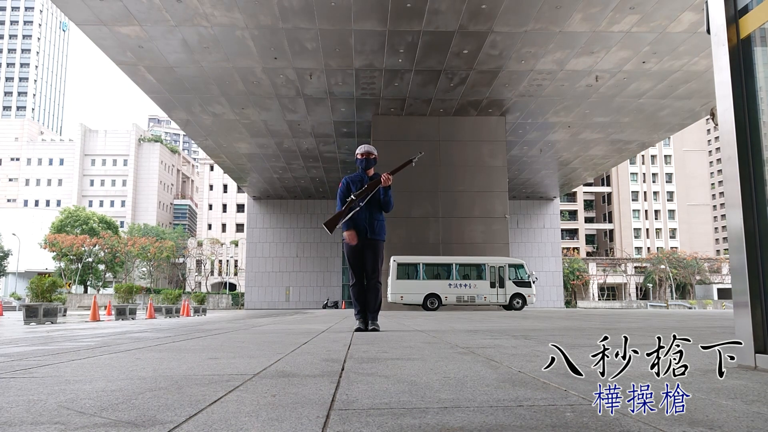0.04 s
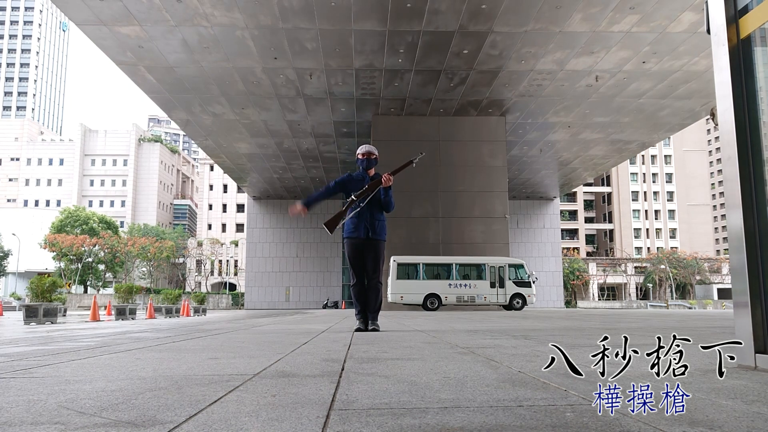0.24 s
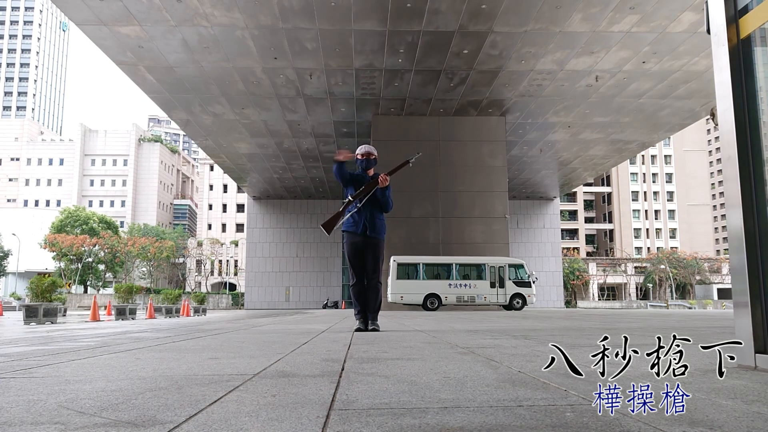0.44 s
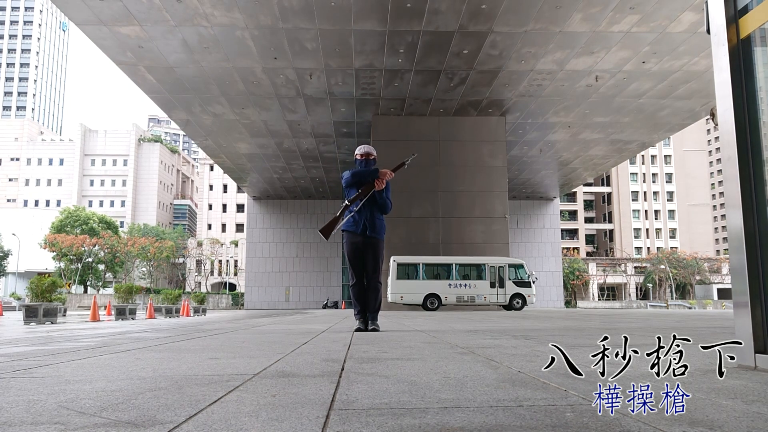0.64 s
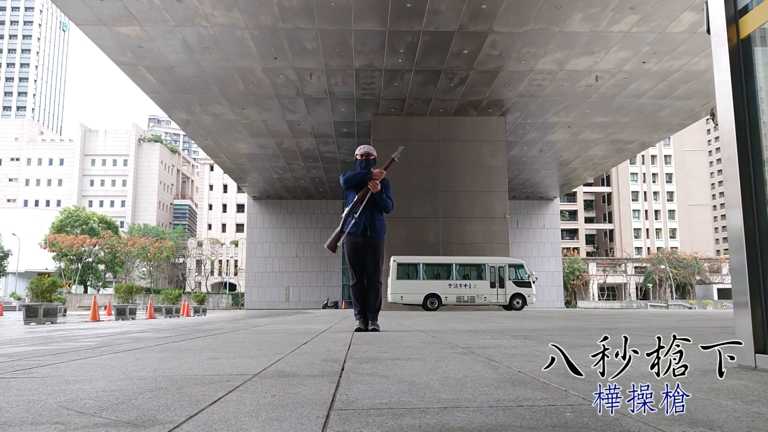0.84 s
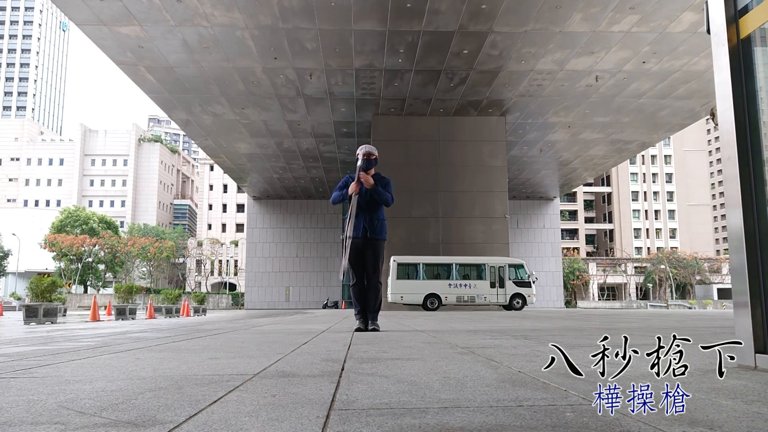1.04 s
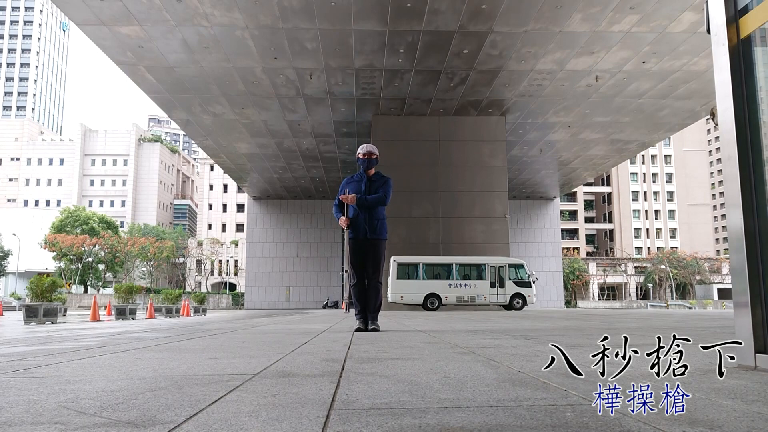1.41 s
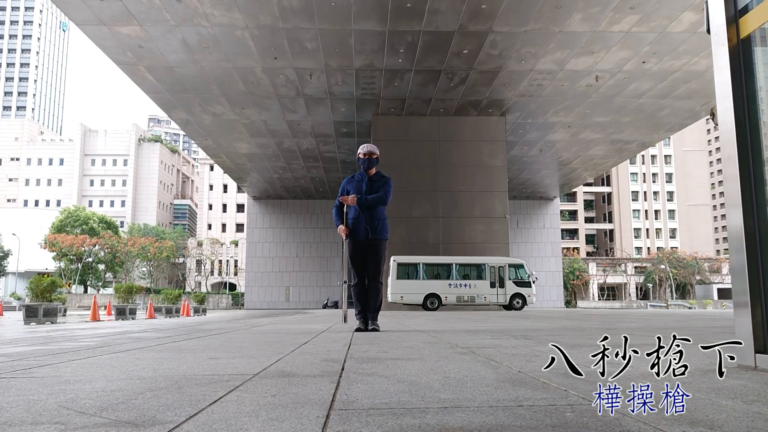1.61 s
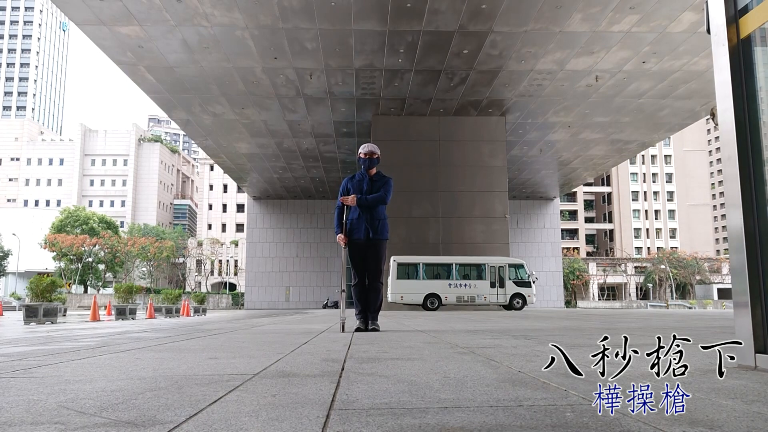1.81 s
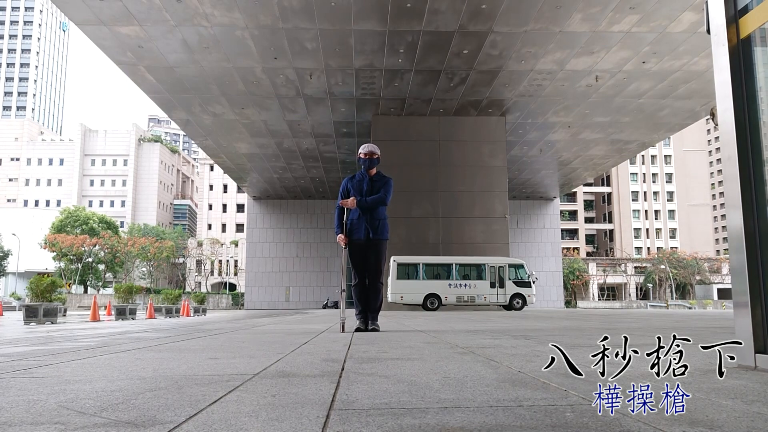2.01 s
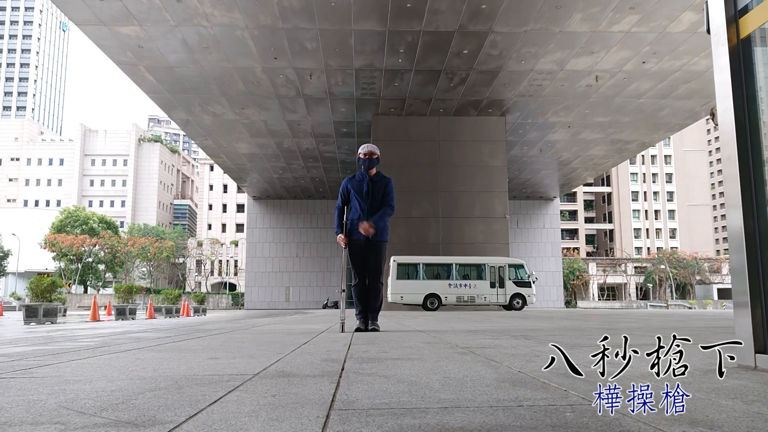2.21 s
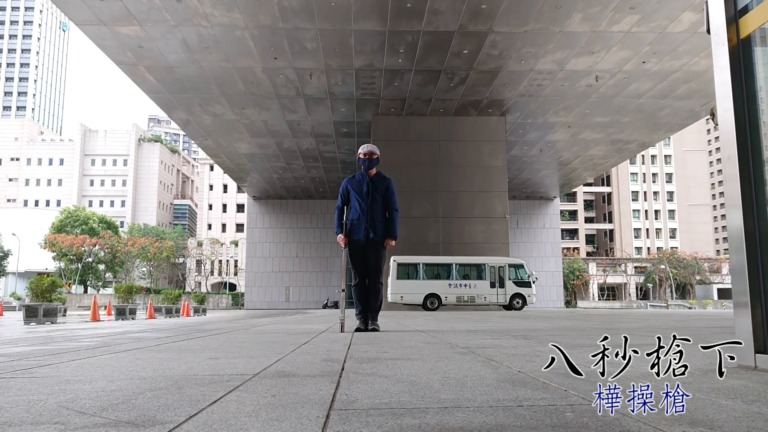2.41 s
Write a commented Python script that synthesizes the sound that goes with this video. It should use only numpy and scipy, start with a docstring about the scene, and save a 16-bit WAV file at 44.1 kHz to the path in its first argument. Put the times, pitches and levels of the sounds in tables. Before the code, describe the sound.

A rifle is handled with dry slaps, then its butt knocks on paving, over faint wind.

```python
"""Wind buffets the microphone, mostly its right port, over distant traffic and faint high squeaks.
Under a concrete overpass, a rifle drill: loose steel fittings jingle and clink, hands slap and slide
on the stock, and at about 2 s the butt is grounded, chattering on the paving and ringing the rifle.
The deck above and the far walls throw the blows back."""
import sys
import numpy as np
from scipy import signal
from scipy.fft import rfft, irfft
from scipy.io import wavfile
from scipy.ndimage import uniform_filter1d

SR = 44100
rng = np.random.default_rng(int(sys.argv[2]) if len(sys.argv) > 2 else 0)


def digitize_waveform(pressure):
    """Quantize a signal to 16-bit integers and store it at the path in sys.argv[1].

    Rows of a 2-D input are taken as channels; values are limited to [-1, 1].
    """
    field = np.atleast_2d(pressure).T
    bounded = np.clip(field, -1, 1)
    quanta = np.round(bounded * 32767).astype(np.int16)
    wavfile.write(sys.argv[1], SR, quanta)


N = 112454
TIME, FREQ = np.arange(N) / SR, np.fft.rfftfreq(N, 1 / SR)


def amp(db):
    """Decibels to gain."""
    return 10 ** (np.asarray(db) / 20)


def unit(x):
    """Scale to rms 1."""
    return x / np.sqrt(np.mean(x ** 2))


def noise():
    """White noise."""
    return rng.standard_normal(N)


def pair(likeness):
    """Left and right noise, from unrelated (0) to identical (1)."""
    return np.sqrt(likeness) * noise() + np.sqrt(1 - likeness) * rng.standard_normal((2, N))


def impulse(at):
    """A single sharp push at a given time."""
    return signal.unit_impulse(N, int(at * SR))


def decay(t60):
    """Envelope that falls 60 dB in t60 seconds."""
    return np.exp(-np.log(1000) * TIME / t60)


def delayed(x, at):
    """The same sound, starting `at` seconds later."""
    start = int(at * SR)
    out = np.zeros_like(x)
    out[..., start:] = x[..., :N - start]
    return out


def convolve(x, h):
    """Pass a sound through an impulse response."""
    return signal.fftconvolve(np.atleast_2d(x), np.atleast_2d(h), axes=-1)[:, :N]


def response(points, size=8192):
    """Minimum-phase impulse response of a curve of f/Hz, level/dB."""
    hz, db = np.array(points).T
    f = np.maximum(np.fft.rfftfreq(size, 1 / SR), 1)
    gain = amp(np.interp(np.log(f), np.log(hz), db))
    cepstrum = irfft(np.log(gain))
    cepstrum[1:size // 2] *= 2
    cepstrum[size // 2 + 1:] = 0
    return irfft(np.exp(rfft(cepstrum)))


def colour(x, points):
    """Colour a white sound, keeping its power."""
    h = response(points)
    return convolve(x, h / np.linalg.norm(h))


def contour(rows):
    """Gain that glides through rows of t/s, level/dB."""
    return amp(np.interp(TIME, *np.array(rows).T))


def swells(rows):
    """A bell-shaped envelope for each row of t/s, level/dB, width/s."""
    return sum(amp(db) * np.exp(-.5 * ((TIME - at) / width) ** 2) for at, db, width in rows)


def blows(rows):
    """Contact force: a fast-dying crunch for each row of t/s, level/dB, decay/s."""
    return sum(amp(db) * delayed(noise() * np.exp(-TIME / fade), at) for at, db, fade in rows)


def eddies(spectrum, span_s=0.099, evenness=0.57):
    """Turbulent pressure at a microphone port, of fairly even strength."""
    pressure = colour(noise(), spectrum)[0]
    window = int(span_s * SR / 2)
    power = uniform_filter1d(uniform_filter1d(pressure ** 2, window), window)
    return unit(pressure / (power + 0.023) ** (evenness / 2))


# wind on the exposed right port: t/s, level/dB
RIGHT_WIND = [(0, -28), (.12, -36), (.25, -28.5), (0.409, -26), (.46, -41.5), (.57, -26.5), (0.771, -26.5),
              (0.817, -17.5), (0.859, -30.5), (0.928, -22), (1.02, -33), (1.17, -27), (1.25, -34),
              (1.37, -27.5), (1.68, -27.5), (1.77, -26), (1.9, -26), (1.94, -40.5), (2.24, -29),
              (2.349, -37), (2.55, -33.5)]
# single gusts on each port: t/s, level/dB, width/s
RIGHT_GUSTS = [(.907, -23, 0.0035), (.928, -24.5, 0.0026), (1.573, -20.5, .002), (1.591, -22.5, 0.0056),
               (1.7095, -12.5, 0.0023), (1.7205, -13, 0.0067), (1.750, -17.5, 0.0019), (1.763, -21, 0.0043)]
LEFT_GUSTS = [(1.04, -37, 0.019), (1.744, -29, .008), (1.82, -45, 0.025), (1.97, -40, 0.04)]
# spectra of the buffeting and of the right port's gusts: f/Hz, level/dB
BUFFET_COLOUR = [(22, -47), (36, -11), (52, 6.5), (75, 1.5), (110, -1), (190, -11), (300, -21), (600, -39),
                 (6000, -92)]
GUST_COLOUR = [(25, -33.5), (45, -8), (75, 5.5), (130, -6.5), (195, -0.5), (280, -11), (480, -20.5),
               (900, -41), (6000, -100)]
def wind(swirl_db=-2.5, lee_db=-49.5):
    """Air buffets each port, the left in the lee; gusts on the right are brighter and thump at the crest."""
    crests = sum(amp(db) * np.sqrt(width * SR) * impulse(at) for at, db, width in RIGHT_GUSTS)
    thumps = colour(crests, GUST_COLOUR)[0]
    swirl = amp(swirl_db) * eddies(GUST_COLOUR) * swells(RIGHT_GUSTS)
    right = eddies(BUFFET_COLOUR) * contour(RIGHT_WIND) + swirl + thumps
    left = eddies(BUFFET_COLOUR) * (amp(lee_db) + swells(LEFT_GUSTS))
    return np.array([left, right])


# spectrum of the streets from a distance: f/Hz, level/dB
TRAFFIC_COLOUR = [(30, 2), (70, 4.5), (200, 2), (450, 0), (900, -5.5), (1500, -13), (3000, -14.5),
                  (5000, -19.5), (7000, -29.5), (11000, -37), (15000, -43)]
# their slow drift in loudness: t/s, level/dB
TRAFFIC_LEVEL = [(0, -49.5), (.9, -51), (1.5, -51), (1.85, -51.5), (2.55, -48.5)]
def traffic():
    """The even wash of distant streets, wide across both ports."""
    return colour(pair(likeness=0.16), TRAFFIC_COLOUR) * contour(TRAFFIC_LEVEL)


# faint high squeaks in the background: t/s, length/s, f/Hz, half-width/Hz, level/dB
SQUEAKS = [(0.13, 0.093, 4710, 60, -64), (0.267, 0.47, 6270, 220, -69.5), (0.859, 0.0061, 6100, 1090, -50),
           (1.055, 0.061, 3200, 70, -64)]
def squeaks():
    """Narrow bands of noise, heard as thin wavering tones."""
    out = np.zeros((2, N))
    for at, length, hz, width, db in SQUEAKS:
        band = 1 / (1 + ((FREQ - hz) / width) ** 2) ** 2
        tone = unit(irfft(rfft(pair(likeness=0.51)) * band, N))
        flat_swell = np.exp(-(2 * (TIME - at) / length - 1) ** 4)
        out += amp(db) * tone * flat_swell
    return out


# small metallic jingles at the rifle: t/s, level/dB, width/s
JINGLES = [(.319, -46.5, 0.0069), (.366, -56, 0.0044), (.474, -53, 0.0091)]
# their spectrum: f/Hz, level/dB
JINGLE_COLOUR = [(1500, -43.5), (3600, 5.5), (5400, -2.5), (6350, 15.5), (7200, -8), (11000, -3),
                 (15000, -21)]
def jingles():
    """Metal rubs on metal in short swells of fine friction."""
    return colour(noise() * swells(JINGLES), JINGLE_COLOUR)


def paving(x, scatter_db=-3.5, decay_s=0.00092, above_hz=1200):
    """Direct sound plus treble scattered off the ground by the microphone, different at each port."""
    highpass = signal.butter(2, above_hz, "high", fs=SR, output="sos")
    scatter = pair(likeness=0) * np.exp(-TIME / decay_s)
    scatter = signal.sosfilt(highpass, scatter[:, :SR // 20])
    scatter /= np.linalg.norm(scatter, axis=1, keepdims=True)
    return x + amp(scatter_db) * convolve(x, scatter)


def bloom(rise_s, t60):
    """Unit-energy envelope of reflections that build up and die away."""
    rise = 1 - np.exp(-(TIME / rise_s) ** 2)
    return unit(rise * decay(t60)) / np.sqrt(N)


# echoes from the deck overhead and the far walls: delay/s, level/dB
ECHOES = [(0.0414, -14), (.052, -13.5), (0.0653, -19), (0.087, -24.5), (.246, -27.5)]
# their spectrum: f/Hz, level/dB
ECHO_COLOUR = [(200, 3), (1000, 4), (3400, 1.5), (7000, -0.5), (15000, -15)]
# reverberation under the deck: f/Hz, early level/dB, early t60/s, late level/dB, late t60/s
REVERB_BANDS = [(199, -30.5, .3, -25.5, 1.4), (610, -13.5, 0.9, -26, 0.99), (1540, -6.5, 0.34, -12, 1.7),
                (3550, -11, 0.26, -15, 1.4), (6500, -17, 0.6, -17, 1.3), (13300, -3.5, 0.35, -27, .7)]
def overpass(x, smear_s=0.0022, early_rise_s=0.033, late_rise_s=0.32):
    """The concrete returns distinct echoes, a short early wash and a slowly building tail."""
    echoes = np.zeros((2, N))
    for delay, db in ECHOES:
        smear = unit(pair(likeness=1) * np.exp(-TIME / smear_s)) / np.sqrt(N)
        echoes += amp(db) * delayed(smear, delay)
    space = convolve(echoes, response(ECHO_COLOUR))
    wash = rfft(pair(likeness=0.17))
    log_f, log_centres = np.log(np.maximum(FREQ, 1)), np.log(np.array(REVERB_BANDS)[:, 0])
    for share, (_, early_db, early_t60, late_db, late_t60) in zip(np.eye(len(log_centres)), REVERB_BANDS):
        band = irfft(wash * np.interp(log_f, log_centres, share), N)
        early = amp(early_db) * bloom(early_rise_s, early_t60)
        late = amp(late_db) * bloom(late_rise_s, late_t60)
        space += band * np.hypot(early, late)
    return convolve(x, space)


# loose steel fittings on the rifle: t/s, level/dB, f/Hz, t60/s
CLINKS = [(0.451, -49, 3180, 0.052), (2.032, -28, 5430, 0.035), (2.033, -48.5, 12360, 0.13),
          (2.0417, -24.5, 3295, 0.014), (2.0426, -31, 5000, 0.015), (2.055, -34, 5470, 0.024),
          (2.075, -36.5, 4210, 0.027), (2.0781, -40, 5560, 0.07), (2.0833, -31, 3200, 0.008),
          (2.1068, -32, 3240, 0.014), (2.173, -30, 3380, 0.0048)]
def clinks(detune=0.05, grit_gain=1.1, attack_s=0.00051):
    """Each fitting rings briefly with a close pair of partials over a gritty contact."""
    out = np.zeros(N)
    attack = 1 - np.exp(-TIME / attack_s)
    for at, db, hz, t60 in CLINKS:
        phase = 2 * np.pi * hz * TIME
        neighbour = np.sin(phase * (1 + detune * rng.standard_normal()))
        grit = grit_gain * unit(uniform_filter1d(noise(), size=24)) * np.sin(phase)
        ring = np.sin(phase) * decay(t60) + (neighbour + grit) * decay(t60 / 2)
        out += amp(db) * delayed(ring * attack, at)
    return out


# palms on the rifle, and the stock knocking in the grip: t/s, level/dB, decay/s
SLAPS = [(.8836, -41.5, 0.0066), (.8875, -40, 0.0046), (.8975, -41.5, 0.0086)]
KNOCKS = [(.885, -48, .006), (.931, -53, 0.0072), (.996, -51, 0.0049)]
# their spectra: f/Hz, level/dB
SLAP_COLOUR = [(200, -10), (900, -6.5), (1500, -1), (2600, -0.5), (4400, 3.5), (5600, -0.5), (11000, -15.5),
               (15000, -24.5)]
KNOCK_COLOUR = [(1100, -14.5), (1600, 2.5), (2200, -18), (9000, -35.5)]
def slaps():
    """Palms catch the rifle; too damped to ring, it knocks hollowly as it settles in the grip."""
    return colour(blows(SLAPS), SLAP_COLOUR) + colour(blows(KNOCKS), KNOCK_COLOUR)


# light taps of hand and sleeve: t/s, level/dB, decay/s
TAPS = [(1.2052, -52.5, .004), (1.4112, -41.5, 0.0036), (1.4135, -42, 0.01), (1.5722, -42, 0.0042),
        (2.2745, -44.5, 0.0063)]
# the rifle slipping through the hands: t/s, level/dB, width/s
SLIDES = [(1.394, -50.5, 0.0087)]
# spectrum of both: f/Hz, level/dB
HANDLING_COLOUR = [(300, 4.5), (1200, -5), (3000, -1), (6000, 0), (11000, -13.5), (15000, -16)]
def handling():
    """Hand and sleeve tap the rifle, and it slides with a brief swell of friction."""
    friction = noise() * swells(SLIDES)
    return colour(friction + blows(TAPS), HANDLING_COLOUR)


# hard contacts of the butt on the paving: t/s, level/dB
BUTT_CONTACTS = [(1.9908, -3), (1.9930, -4.5), (1.9975, -9.5)]
def chatter(delay_at_1khz_s=0.000706):
    """A fast run of weakening contacts; in the stock's bending waves the treble outruns the bass."""
    contacts = sum(amp(db) * np.exp(-2j * np.pi * FREQ * at) for at, db in BUTT_CONTACTS)
    dispersion = np.exp(-4j * np.pi * delay_at_1khz_s * np.sqrt(1000 * FREQ))
    return irfft(contacts * dispersion, N)


# modes of the rifle: f/Hz, level/dB, t60/s
RIFLE_MODES = [(438, 2, 0.051), (524, 7.5, 0.041), (769, 0.5, 0.078), (932, -5.5, 0.081), (1020, -10, .06),
               (1305, -13, 0.045), (1428, -3, 0.057), (1653, -12, .045), (1708, -1.5, 0.072),
               (2990, -3, 0.085), (3380, -13, .06), (3820, -1, 0.072), (4520, -13, 0.053),
               (5560, -15, 0.046)]
def rifle_ring(force):
    """Stock and steel parts ring after a blow."""
    modes = sum(amp(db) * np.sin(2 * np.pi * hz * TIME) * decay(t60) for hz, db, t60 in RIFLE_MODES)
    return convolve(force, modes / np.linalg.norm(modes))


# the butt's first soft touch, and grit crushed under it: t/s, level/dB, decay/s
BUTT_TOUCH = [(1.979, -31, 0.012), (1.9845, -28, 0.0056)]
GRIT = [(1.991, -27, 0.013), (2.003, -28.5, 0.0049)]
# spectra of the soft thud and the hard crack: f/Hz, level/dB
THUD_COLOUR = [(50, -23), (140, 3), (300, -24), (450, 8), (800, -38), (6000, -74)]
CRACK_COLOUR = [(100, -5), (300, -1), (470, 3), (620, -6.5), (850, -2.5), (1400, 1), (2400, -5.5),
                (4200, -1), (5600, -2.5), (6500, -7), (10000, -15.5), (15000, -26)]
def grounding(ring_db=-1.5):
    """The butt touches, then chatters hard on the paving; the first hard contact rings the rifle."""
    crack = colour(chatter() + blows(GRIT), CRACK_COLOUR)
    thud = colour(blows(BUTT_TOUCH), THUD_COLOUR)
    ring = rifle_ring(impulse(BUTT_CONTACTS[0][0]))
    return thud + crack + amp(ring_db) * ring


def scene():
    """From under the deck: the drill and its echoes, wind at the microphone, traffic far off."""
    butt, fittings = grounding(), clinks()
    catches = slaps() + jingles()
    slides = handling()
    echoes = overpass(butt + amp(-5) * fittings + amp(-1) * catches + amp(-4.5) * slides)
    direct = paving(butt + fittings + catches + slides)
    return direct + echoes + squeaks() + wind() + traffic()


# response of the microphone's ports: f/Hz, left level/dB, right level/dB
MIC_PORTS = [(22.2, -26.5, -17), (41, 1, 0), (2400, 1.5, 1), (4680, -4.5, -2.5), (6980, -15, 0),
             (7780, -32, -19), (8100, -13, -17.5), (9200, -12.5, -22.5), (10030, -0.5, -5.5),
             (14400, 0.5, -1.5), (16000, -6, -15.5)]
def record(dry, top_hz=15700):
    """Each port has its own colour with a deep notch in the treble; the top is cut."""
    ports = np.array(MIC_PORTS)
    left, right = response(ports[:, [0, 1]]), response(ports[:, [0, 2]])
    heard = convolve(dry, np.array([left, right]))
    lowpass = signal.ellip(10, .2, 80, top_hz, fs=SR, output="sos")
    return signal.sosfilt(lowpass, heard)


dry = scene()
out = record(dry)
digitize_waveform(out)
```